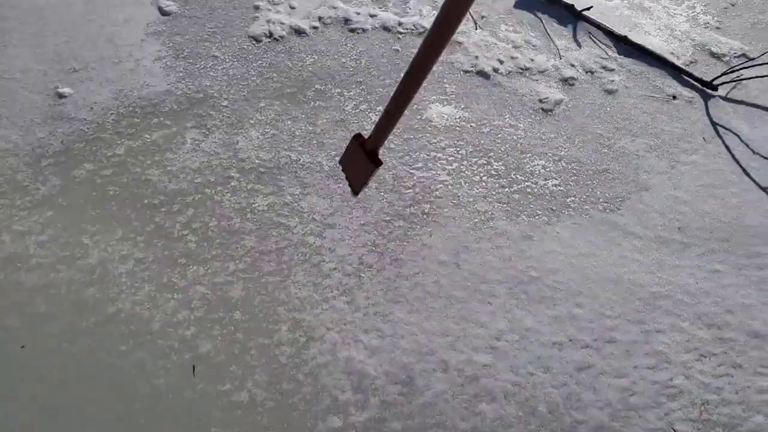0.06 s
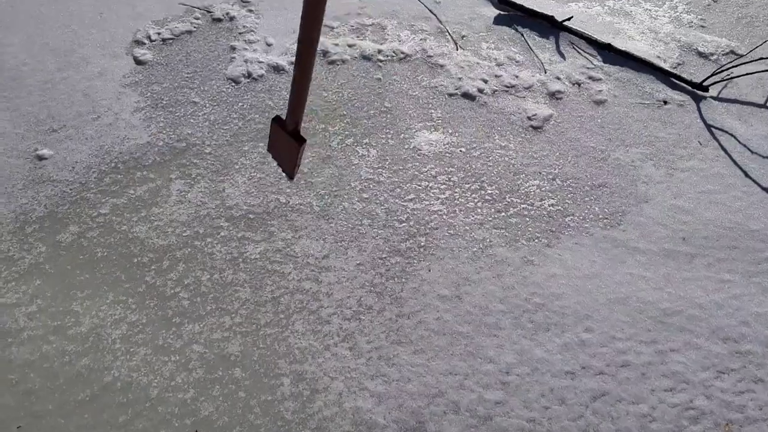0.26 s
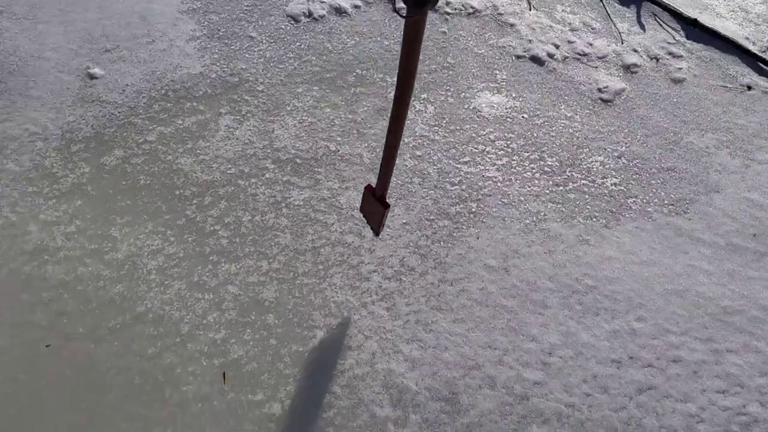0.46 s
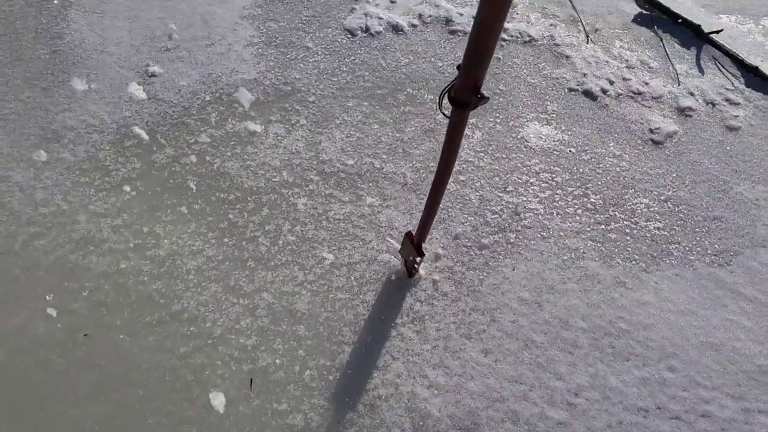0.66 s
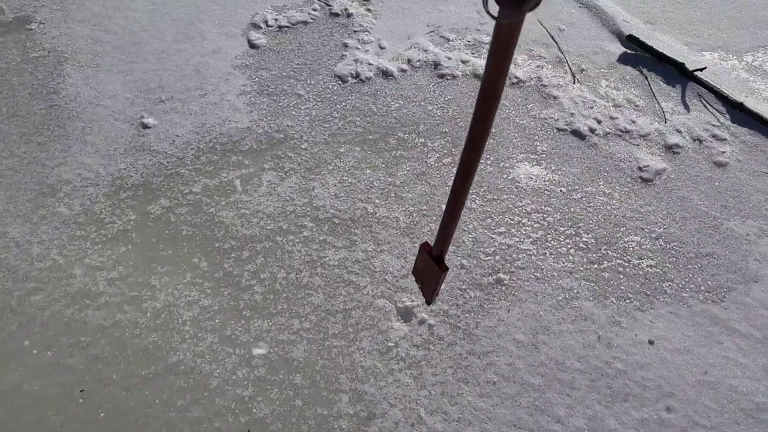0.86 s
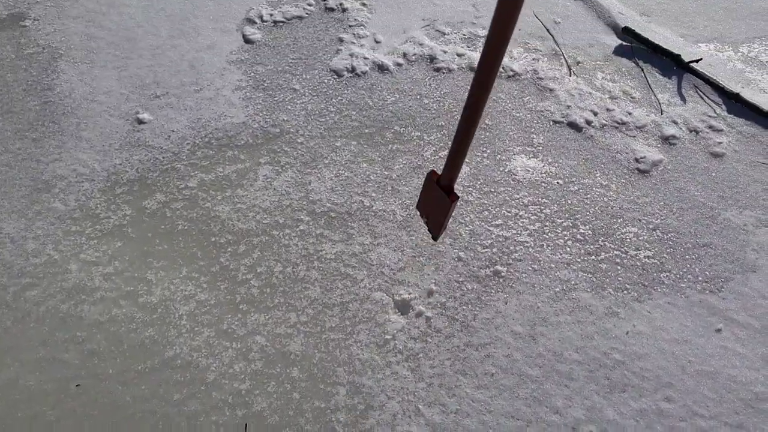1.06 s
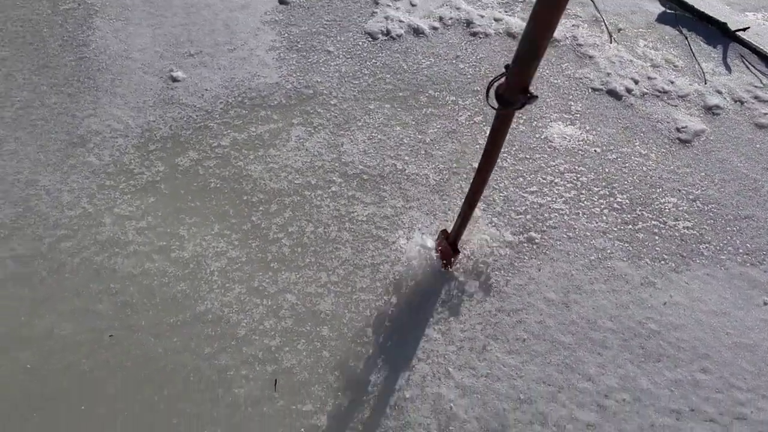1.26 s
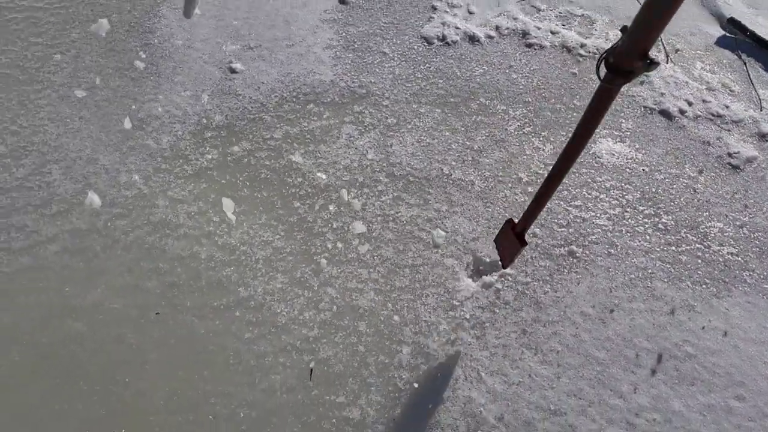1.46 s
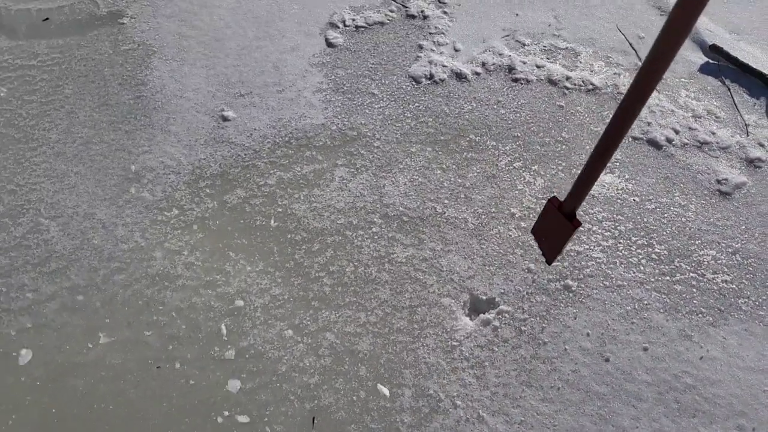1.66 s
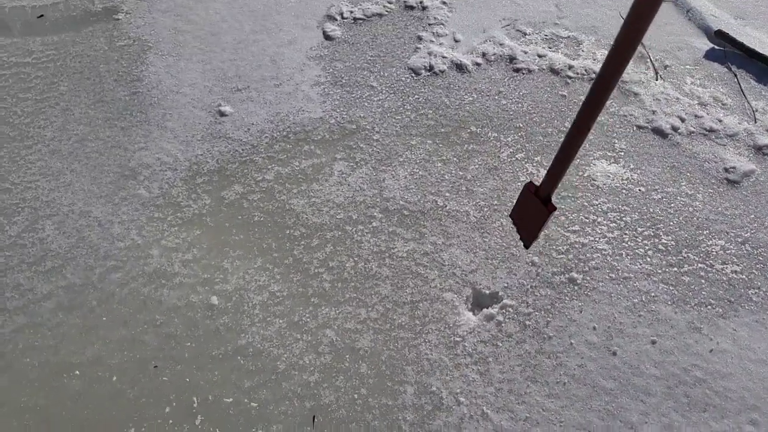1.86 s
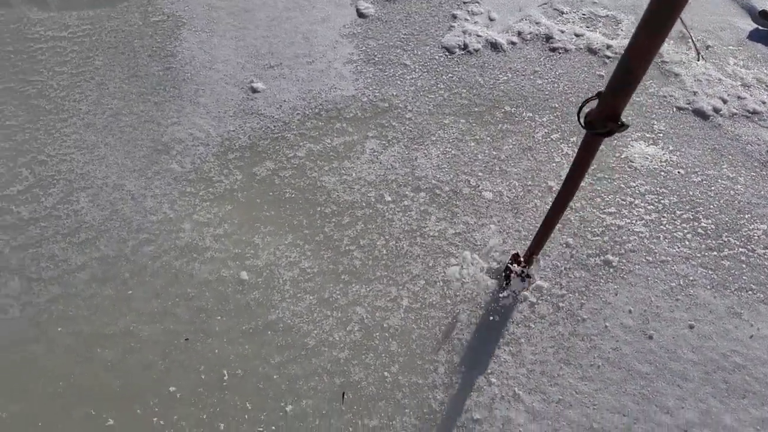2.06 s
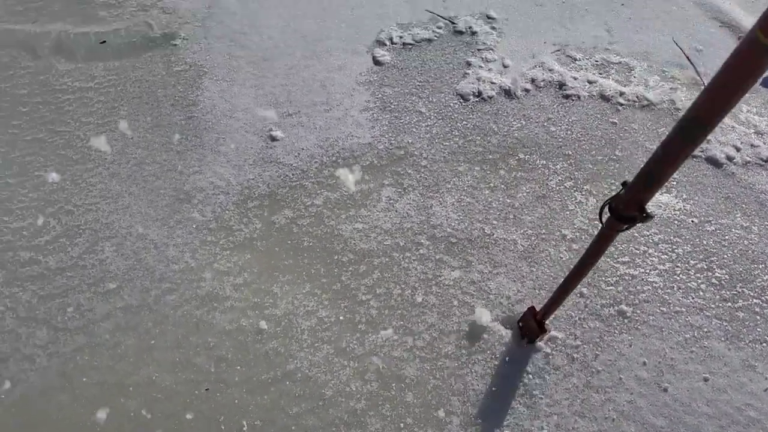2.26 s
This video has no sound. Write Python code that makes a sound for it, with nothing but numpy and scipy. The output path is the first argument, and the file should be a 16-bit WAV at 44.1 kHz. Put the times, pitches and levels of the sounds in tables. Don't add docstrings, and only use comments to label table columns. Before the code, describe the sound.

Ice chopping heard close up outdoors: glove knocks and bright metal clinks first, then three crisp cracking blows about 0.7 seconds apart, each scattering gritty crumbs, over a low wind rumble on a small camera microphone.

```python
import sys
import numpy as np
from scipy import signal
from scipy.fft import rfft, irfft
from scipy.io import wavfile
from scipy.ndimage import uniform_filter1d

SR = 44100
rng = np.random.default_rng(int(sys.argv[2]) if len(sys.argv) > 2 else 0)


def output_pcm(signal):
    pcm = np.clip(np.atleast_2d(signal).T, -1, 1) * 32767
    wavfile.write(sys.argv[1], SR, np.round(pcm).astype(np.int16))


def voltage_ratio(decibels):
    exponent = np.asarray(decibels, float) / 20
    return 10 ** exponent


N = 101429

# frequency in Hz, level in dB.
WIND_COLOUR = [(35, -28), (50, 2.5), (63, 9.5), (85, -6.5), (120, 1), (200, -12.5), (1100, -31),
               (16000, -56.5)]
# time in seconds, level in dB.
WIND_GUSTS = [(0, -34.5), (.3, -41), (.7, -45.5), (1.7, -47.5), (2.0, -46), (2.3, -52.5)]
RUSTLE_TIMES = [0, .028, .04, .108, .122, .42]
RUSTLE_LEVELS = [-52, -59, -33, -41.5, -56.5, -61.5]
RUSTLE_BAND = [350, 860]
KNOCK_TIMES = [
    .2172,
    .2192,
    .2452,
    .2472,
    .038,
    .152,
    .231,
]
# peak in dB, pitch in Hz, decay t60 in seconds.
KNOCK_TONES = [(-13, 744, 0.0043), (-26.5, 940, 0.0081), (-12.5, 630, 0.0026), (-20, 1040, 0.0027),
               (-19, 527, 0.022), (-35.5, 540, 0.022), (-31, 1020, 0.014)]
# frequency in Hz, level in dB per Hz.
GRIT_COLOUR = [(120, -48.5), (200, -11), (1250, -7.5), (1810, -9), (3070, -13.5), (7830, -18.5),
               (9400, -25.5), (13600, -13), (16000, -15)]
# time in seconds, level in dB.
GRIT_MOTION = [(0, -54.5), (.04, -45.5), (.15, -61), (.41, -56), (.45, -46), (.56, -37.5), (.66, -45.5),
               (.72, -49.5), (.88, -62), (1.2, -52.5), (1.28, -52.5), (1.45, -47), (1.6, -48),
               (1.68, -61.5), (1.93, -50.5), (1.99, -34), (2.14, -51.5), (2.17, -56), (2.3, -59)]
# start in seconds, peak in dB, centre in Hz, width in octaves, decay t60 in seconds.
SHARDS = [(.031, -30.5, 2000, 0.42, 0.11), (0.33, -36.5, 2510, 2.4, .01), (0.515, -25, 12000, 1.2, 0.013),
          (.609, -24, 13000, .8, 0.012), (.629, -26, 13500, 0.36, .015), (0.636, -21, 3470, 0.57, 0.018),
          (.7587, -43.5, 7500, 0.24, 0.018), (.7652, -43, 3920, 1.5, 0.0083),
          (.776, -42, 9000, 1.4, 0.0068), (0.795, -31.5, 3980, 1.34, 0.024),
          (1.0719, -40.5, 3000, 1.8, .015), (1.1352, -22, 2565, 0.085, 0.027),
          (1.1352, -28.5, 1170, 0.34, 0.022), (1.204, -37, 4000, 2, 0.013), (1.367, -27, 11500, 0.89, 0.02),
          (1.385, -20, 961, .1, 0.11), (1.388, -22, 2990, 0.056, 0.06), (1.392, -9.5, 11600, 0.35, 0.022),
          (1.483, -42, 8500, .8, 0.0074), (1.4975, -37, 12000, 1.2, .012), (1.514, -36, 14000, .3, 0.022),
          (1.5352, -27, 13000, 1, 0.01), (1.536, -34, 970, .12, 0.14), (1.5625, -34, 4000, 1.3, 0.032),
          (1.607, -47, 11550, .3, .015), (1.6257, -36, 13350, 0.52, 0.013),
          (1.636, -43, 12500, 0.74, 0.011), (1.7968, -39, 7000, 1.2, .012), (1.8044, -35, 7600, 1.5, 0.013),
          (1.836, -30, 5350, 0.057, 0.034), (1.921, -33, 5000, 2.3, 0.018),
          (1.986, -16.5, 8900, 1.2, 0.026), (2.004, -33, 4000, 1.3, 0.024), (2.026, -22, 6100, .8, 0.036),
          (2.0558, -24, 5300, 0.17, 0.031), (2.069, -32, 5000, 0.82, 0.033),
          (2.165, -38.5, 9000, 1.6, 0.012), (2.1887, -38.5, 3000, 1.8, 0.036),
          (0.2458, -29, 3160, 1.3, 0.0093), (.254, -30.5, 1650, 1.4, 0.14)]
# start in seconds, peak in dB, own note in Hz, left-right difference in dB.
COLLAR_CLINKS = [(0.2644, -9, 12570, 5), (0.36, -32.5, 12700, -1.5), (0.437, -5.5, 8260, -0.5),
                 (0.4591, -11, 8200, -5.5), (0.4887, -23.5, 6460, -10), (0.6693, -16, 13360, 4),
                 (1.0254, -19, 4800, 3.5), (1.0932, -23.5, 5290, -5.5), (1.1178, -36.5, 5380, 2.5),
                 (1.7673, -40, 5400, 16.5), (1.7794, -31, 6680, 4.5), (1.945, -12, 10300, -5),
                 (2.0818, -22.5, 13600, 3), (2.1124, -30, 13700, -17), (2.1208, -25, 7000, 2),
                 (2.2125, -34, 7700, 6)]
# frequency in Hz, level in dB.
COLLAR_MODES = [(5300, -22.5), (6880, -6.5), (8075, -1), (10300, -7), (11900, -14.5), (13800, 0.5),
                (15300, -8)]
# frequency in Hz, level in dB, decay t60 in seconds.
SHAFT_MODES = [(1233, -2, .05), (2245, 0, .17)]
THUMP_TIMES = [
    .531,
    .533,
    .536,
    1.255,
    1.262,
    1.972,
    1.9675,
]
# peak in dB, pitch in Hz, decay t60 in seconds.
THUMP_TONES = [(-10.5, 171, 0.024), (-13, 426, 0.025), (-15, 66, 0.053), (-19, 209.3, 0.068),
               (-26.5, 70.4, 0.13), (-11, 119, 0.04), (-10, 66, 0.096)]
SPLIT_TIMES = [
    .525,
    .5431,
    .5463,
    .6178,
    1.2722,
    1.9637,
]
SPLIT_LEVELS = [-4, -3, 0, -12, -7, -9]
# frequency in Hz, level in dB per Hz.
ICE_COLOUR = [(180, -16.5), (300, -12.5), (1410, -6), (3030, 0.5), (3830, -2), (6300, -7), (8940, -19.5),
              (12900, -20), (16000, -27)]
# frequency in Hz, level in dB.
SHEET_MODES = [(294, 3.5), (439, 9), (644, 3.5), (929, 1.5), (1234, 1)]
# start in seconds, peak in dB, ring in Hz, decay t60 in seconds, tilt in dB per octave.
CHIP_LANDINGS = [(0.4281, -23.5, 7800, 0.036, -2.5), (0.5945, -19.5, 4400, 0.087, -3),
                 (0.6168, -9, 4360, 0.027, -0.5), (0.6495, -21, 2580, 0.011, 5),
                 (0.6982, -36.5, 1710, 0.096, -2.5), (0.7808, -26.5, 3120, 0.12, -4.5),
                 (1.1352, -14, 5550, 0.031, 5.5), (1.2977, -16, 2450, 0.026, -8),
                 (1.3369, -15.5, 5240, 0.081, 8.5), (1.439, -22, 4920, 0.06, -0.5),
                 (1.5065, -35, 1300, 0.041, 0), (1.5336, -27.5, 4970, 0.023, -3),
                 (1.8357, -20.5, 2050, 0.037, 7.5), (1.9086, -31, 3120, 0.11, -8),
                 (2.0328, -16.5, 5060, 0.026, 5.5), (2.0555, -27.5, 5430, 0.13, 1),
                 (2.2482, -36, 7100, 0.034, 4)]
# start in seconds, peak in dB, ring in Hz, decay t60 in seconds, tilt in dB per octave.
BLOW_CRACKS = [(0.5215, -11, 2260, 0.026, 4), (0.5245, -3.5, 2360, 0.014, 3), (0.5432, -11, 3060, 0.051, 5),
               (0.5444, -6, 2090, 0.028, 8), (0.5591, -13, 6390, 0.047, 4), (1.24, -20, 4730, 0.015, 3.5),
               (1.2515, -3, 3420, 0.024, -3.5), (1.2545, -3.5, 2080, 0.022, 7.5),
               (1.272, -6.5, 3080, 0.035, 6), (1.3116, -6.5, 4410, 0.031, 5.5),
               (1.3847, -9, 7710, 0.02, 10), (1.3909, -9, 4930, 0.047, -1.5),
               (1.4089, -17.5, 3860, 0.052, 2.5), (1.9499, -13, 2100, 0.054, -0.5),
               (1.962, -9, 2260, 0.065, -1.5), (1.9679, -6.5, 2390, 0.026, -2.5),
               (1.9714, -5, 2170, 0.02, 9.5), (1.9841, -18, 2400, 0.0067, -15.5)]
CAMERA_BAND = [38, 16000]


def rms1(x):
    return x / np.sqrt(np.mean(x ** 2) + 1e-20)


def curve(points):
    p = np.array(points, float)
    return np.interp(np.arange(N) / SR, p[:, 0], p[:, 1])


def colour(x, points, tilt_db=0.):
    p, size = np.array(points, float), 4096
    f = np.maximum(np.arange(size // 2 + 1) * SR / size, 10)
    db = np.interp(np.log(f), np.log(p[:, 0]), p[:, 1], left=-60)
    db = db + tilt_db * np.log2(np.maximum(f, 500) / 3000)
    c = irfft(db * np.log(10) / 20)
    c[1:size // 2] *= 2
    c[size // 2 + 1:] = 0
    response = irfft(np.exp(rfft(c)))
    return signal.fftconvolve(x, response[None], axes=1)[:, :x.shape[1]]


def bandpass(x, order, edges_hz):
    return signal.sosfilt(signal.butter(order, edges_hz, "band", fs=SR, output="sos"), x)


def ports(draw):
    treble = signal.lfilter(*signal.butter(2, 1480, "high", fs=SR), draw[1])
    side = voltage_ratio(-3) * treble + voltage_ratio(-10.5) * draw[1]
    return np.array([draw[0] + side, draw[0] - side])


def clicks(count, spread_db):
    g = rng.standard_normal((2, count))
    return ports(g * voltage_ratio(spread_db * np.minimum(rng.exponential(size=count), 4)))


def walk(rate_hz):
    k = int(SR / rate_hz)
    steps = np.repeat(rng.standard_normal(N // k + 1), k)
    return uniform_filter1d(uniform_filter1d(steps, k), k)[:N]


def rings(modes, count):
    t = np.arange(count) / SR
    return sum(voltage_ratio(db) * np.sin(2 * np.pi * hz * t) * voltage_ratio(-60 * t / t60) for hz, db, t60 in modes)


def strike(x, modes, count):
    return signal.fftconvolve(x, rings(modes, count)[None], axes=1)[:, :x.shape[1]]


def add(out, x, at_s, db, pan_db=0.):
    i = int(at_s * SR)
    top = np.sqrt(uniform_filter1d(np.mean(x ** 2, 0), size=100).max())
    pan = voltage_ratio(np.array([[pan_db / 2], [-pan_db / 2]]))
    x = (x * voltage_ratio(db) / top * pan)[:, :N - i]
    out[:, i:i + x.shape[1]] += x


def wind():
    x = ports(rng.standard_normal((2, N)))
    return rms1(colour(x, WIND_COLOUR)) * voltage_ratio(curve(WIND_GUSTS) + 0.62 * walk(10.82) + 1)


def rustle():
    x = bandpass(clicks(N, 4.7), 4, RUSTLE_BAND)
    gone_db = -60 * (np.arange(N) / SR > RUSTLE_TIMES[-1])
    return rms1(x) * voltage_ratio(curve(np.c_[RUSTLE_TIMES, RUSTLE_LEVELS]) + gone_db + 3.4 * walk(80))


def pushes(times, rows, rise_turns):
    out, count = np.zeros((2, N)), 8000
    t = np.arange(count) / SR
    for s, (db, hz, t60) in zip(times, rows):
        swell = (1 - np.exp(-t * hz / rise_turns)) ** 2
        add(out, (rings([(hz, 0, t60)], count) * swell)[None], s, db - 4.5, -.6)
    return out


def knocks():
    dull = signal.butter(4, 1450, fs=SR, output="sos")
    return signal.sosfilt(dull, pushes(KNOCK_TIMES, KNOCK_TONES, 0.36))


def grit():
    x, all_db = 0, 5 * walk(150)
    for hz in 300 * 2 ** np.arange(0, 5.6, .5):
        patter = clicks(N, 6.4) * voltage_ratio(all_db + 7.9 * walk(100))
        x = x + bandpass(patter, 1, [hz / 1.15, hz * 1.15]) / np.sqrt(hz)
    return rms1(colour(x, GRIT_COLOUR, 1.6)) * voltage_ratio(curve(GRIT_MOTION))


def crumbs():
    out, count = np.zeros((2, N)), 500
    t = np.arange(count) / SR
    level_db = curve(GRIT_MOTION)
    for when, size, note in rng.random((70, 3)):
        x = colour(clicks(count, 2.7) * voltage_ratio(-60 * t / 0.0051), ICE_COLOUR, 2 + 8 * (note - .5))
        add(out, x, when * (N - 1) / SR, level_db[int(when * (N - 1))] - 9 + 8 * size)
    return out


def shards():
    out, count = np.zeros((2, N)), 5000
    t = np.arange(count) / SR
    for s, db, hz, octaves, t60 in SHARDS:
        half_width = np.clip(octaves, .03, 3) / 2
        edges_hz = np.clip(hz * 2 ** (half_width * np.array([-1, 1])), 100, 17000)
        x = clicks(count, 3.5) * voltage_ratio(-60 * t / np.clip(t60, .005, .2))
        add(out, bandpass(x, 2, edges_hz), s, db - 10)
    return out


def collar():
    out, count = np.zeros((2, N)), 3000
    t = np.arange(count) / SR
    rise_s, t60_s, ring_t60_s = 0.00062, 0.0032, .014
    scatter_db, favour_db = 6.5, -1.5
    for s, db, own_hz, pan_db in COLLAR_CLINKS:
        decay = voltage_ratio(-60 * t / t60_s) + voltage_ratio(-15.0 - 60 * t / 0.022)
        tap = clicks(count, 3.6) * (1 - np.exp(-t / rise_s)) * decay
        spot_db = scatter_db * rng.standard_normal(len(COLLAR_MODES))
        modes = [(own_hz, -2, ring_t60_s)]
        for (hz, mode_db), e in zip(COLLAR_MODES, spot_db):
            modes.append((hz, mode_db + e - favour_db * abs(np.log2(hz / own_hz)), ring_t60_s))
        ring = rms1(strike(tap, modes, count))
        bright = [(500, -10.5), (4000, 9.0), (16000, 12.0)]  # Hz, dB
        tick = rms1(colour(tap, bright, 4 * np.log2(own_hz / 8000)))
        add(out, ring + voltage_ratio(-1.5) * tick, s, db - 8, pan_db)
    add(out, rings(SHAFT_MODES, 6800)[None] * np.ones((2, 1)), .2655, -40.5)
    return out


def thumps():
    return pushes(THUMP_TIMES, THUMP_TONES, 0.33)


def splits():
    x = np.zeros((2, N))
    x[:, (np.array(SPLIT_TIMES) * SR).astype(int)] = voltage_ratio(np.array(SPLIT_LEVELS))
    x = colour(x, ICE_COLOUR, 1.44)
    return x / np.abs(x).max() * .8


def fracture(rows, spread_db, rise_s, sheet_db):
    out, count = np.zeros((2, N)), 6000
    t = np.arange(count) / SR
    ring_db, ring_t60_s, sheet_t60_s = -4.5, 0.015, .045
    tail_db, tail_t60_s, tail_tilt_db = -22.5, 0.13, -6.5
    sheet_modes = [(f, d, sheet_t60_s) for f, d in SHEET_MODES]
    for s, db, hz, t60, tilt_db in rows:
        swarm = clicks(count, spread_db) * (1 - np.exp(-t / rise_s)) ** 2
        snap = swarm * voltage_ratio(-60 * t / np.clip(t60, .008, .2))
        patchy_db = 7 * walk(195)[:count]
        tail = swarm * voltage_ratio(tail_db - 60 * t / tail_t60_s + patchy_db)
        piece = [(hz, 16.0, ring_t60_s), (hz * 0.93, -13.5, ring_t60_s)]
        ring = strike(snap, piece, 1500)
        sheet = strike(snap, sheet_modes, 3400)
        broad = colour(snap, ICE_COLOUR, tilt_db) + colour(tail, ICE_COLOUR, tail_tilt_db)
        whole = rms1(broad) + voltage_ratio(ring_db) * rms1(ring) + voltage_ratio(sheet_db) * rms1(sheet)
        add(out, whole, s - rise_s, db - 8.5)
    return out


def chips():
    return fracture(CHIP_LANDINGS, 4.9, 0.00054, -21)


def cracks():
    return fracture(BLOW_CRACKS, 4.4, 0.0025, -11.5)


def scene():
    background = wind() + rustle() + knocks()
    debris = grit() + crumbs() + shards() + chips()
    return background + debris + collar() + thumps() + splits() + cracks()


def roll_off(x):
    return signal.sosfilt(signal.butter(12, 17000, fs=SR, output="sos"), x)


def record(dry):
    low_hz, high_hz = CAMERA_BAND
    dry = signal.sosfilt(signal.butter(3, low_hz, "high", fs=SR, output="sos"), dry)
    dry = signal.sosfilt(signal.ellip(8, .3, 40, high_hz, fs=SR, output="sos"), dry)
    return roll_off(np.clip(dry, -1, 1))


dry = scene()
out = record(dry)
output_pcm(out)
```